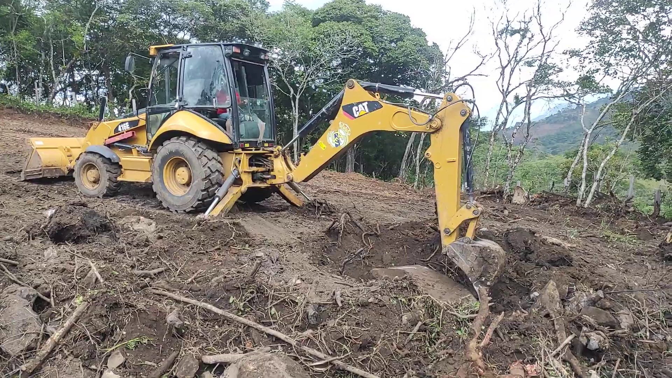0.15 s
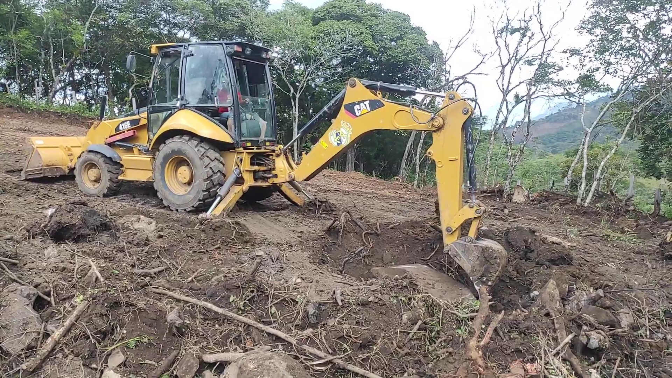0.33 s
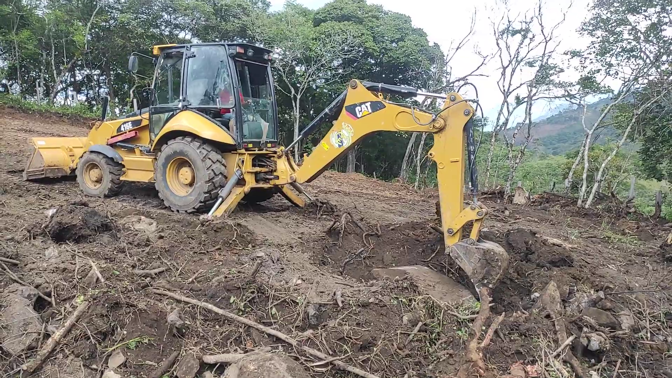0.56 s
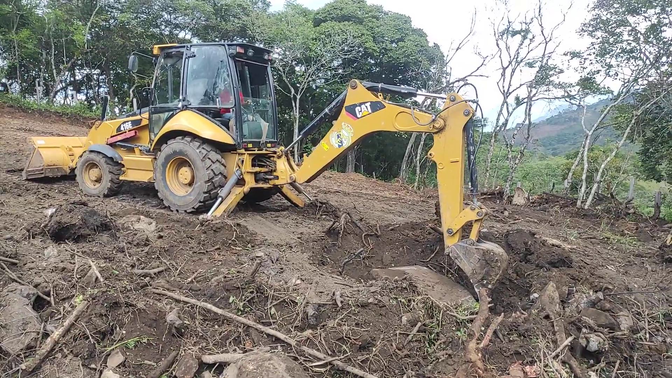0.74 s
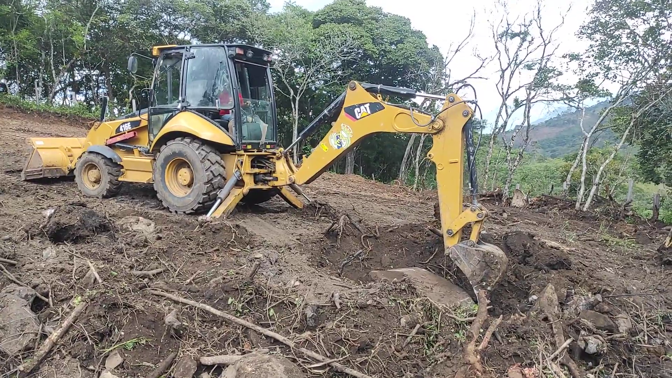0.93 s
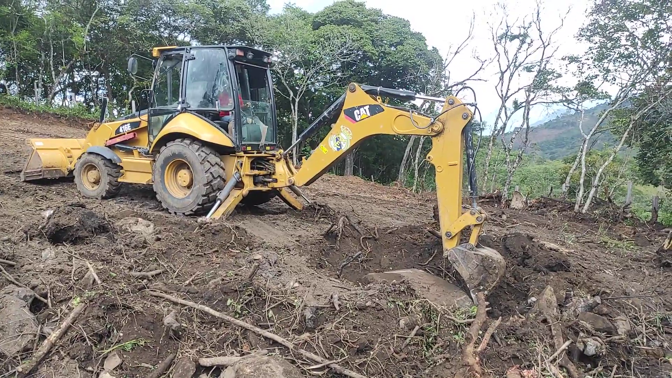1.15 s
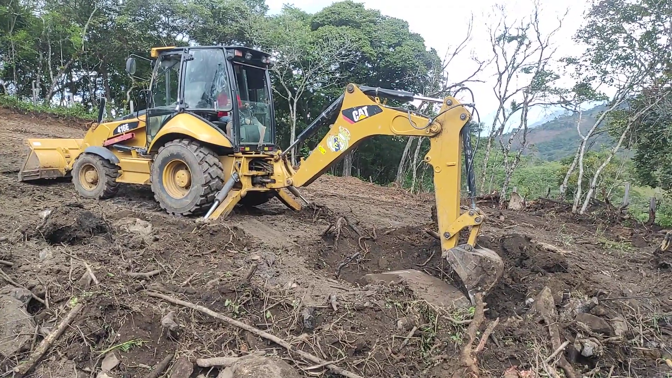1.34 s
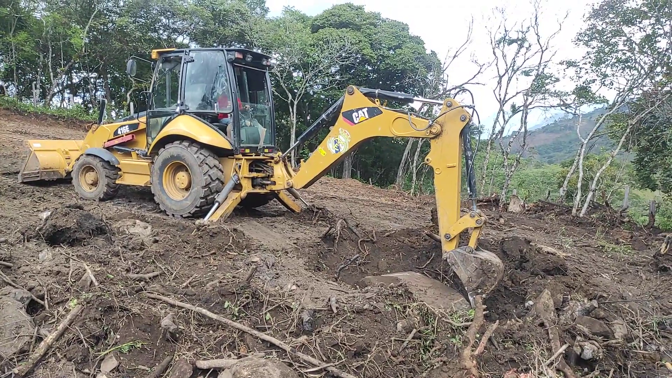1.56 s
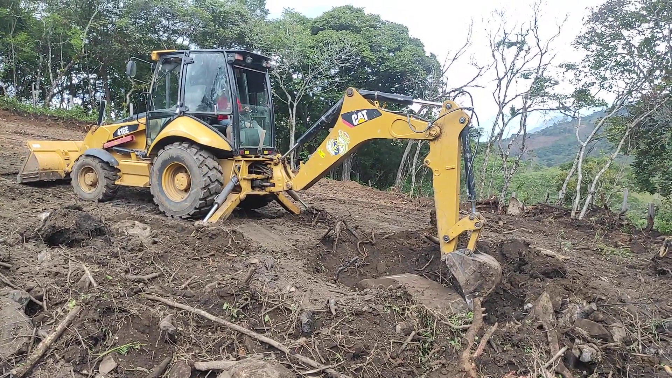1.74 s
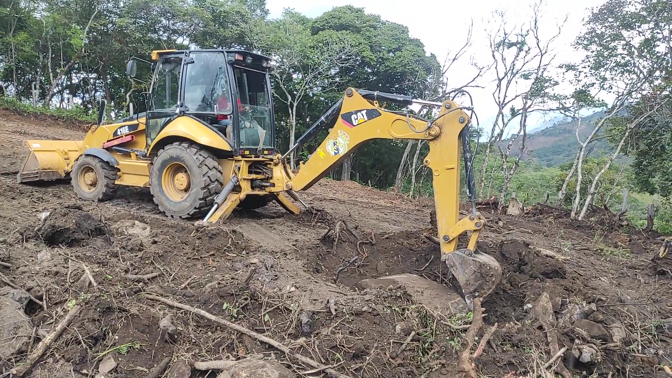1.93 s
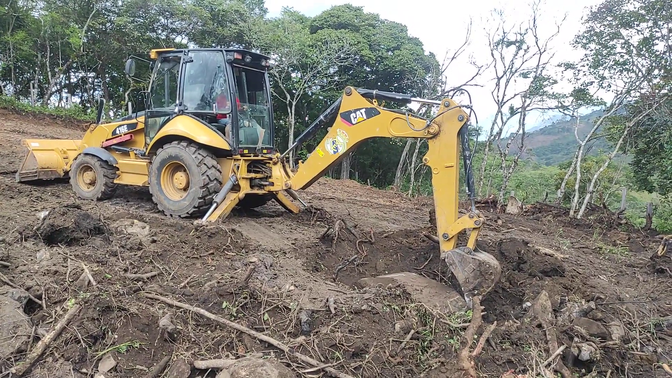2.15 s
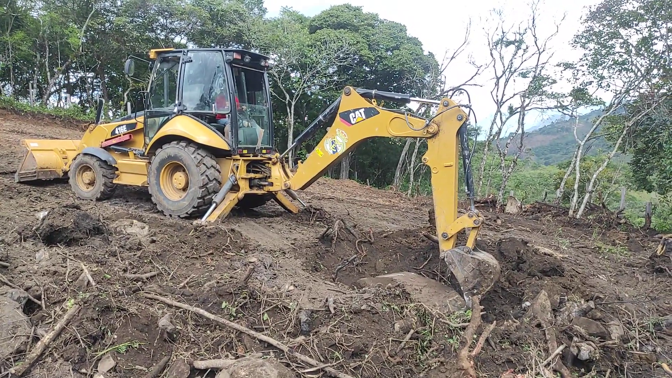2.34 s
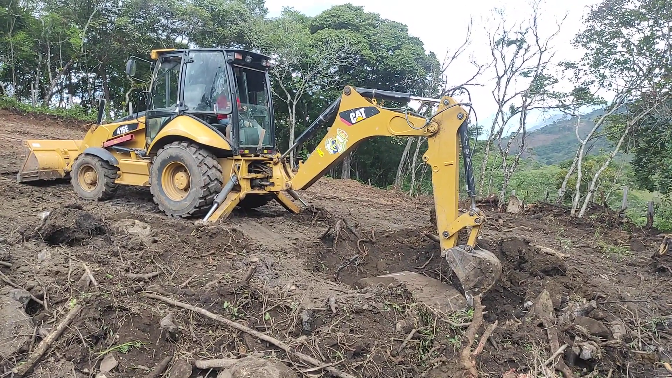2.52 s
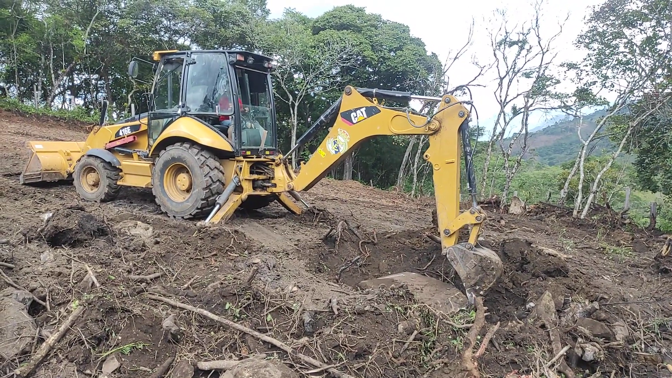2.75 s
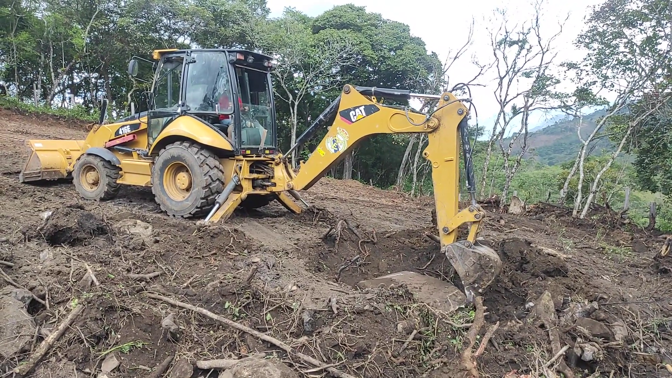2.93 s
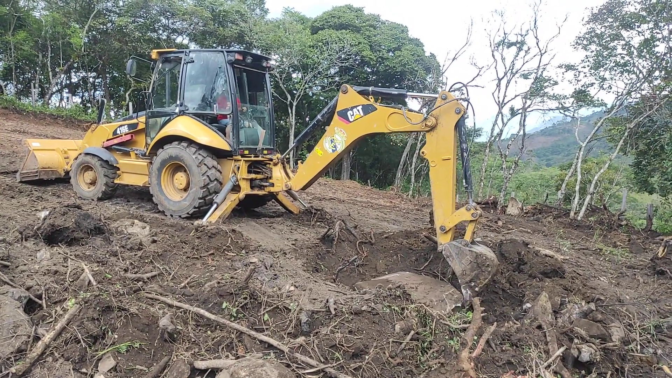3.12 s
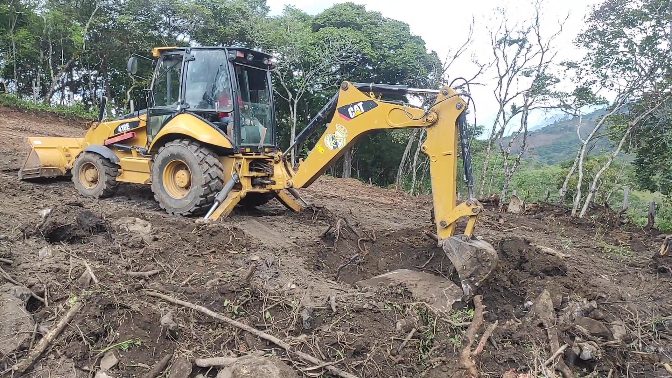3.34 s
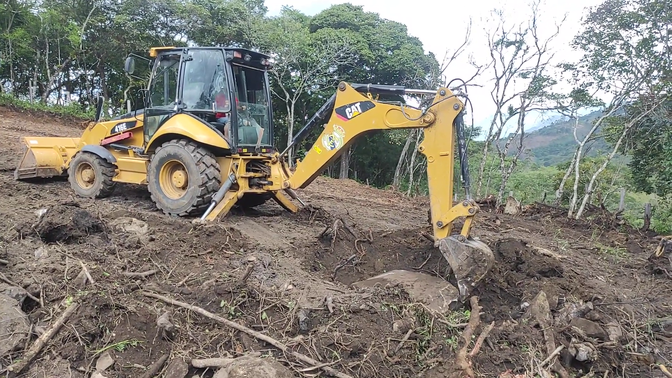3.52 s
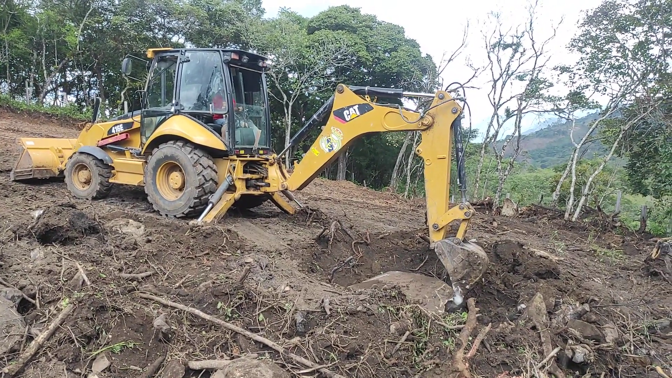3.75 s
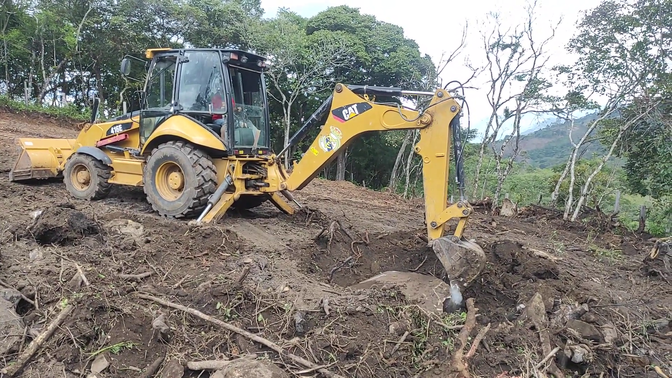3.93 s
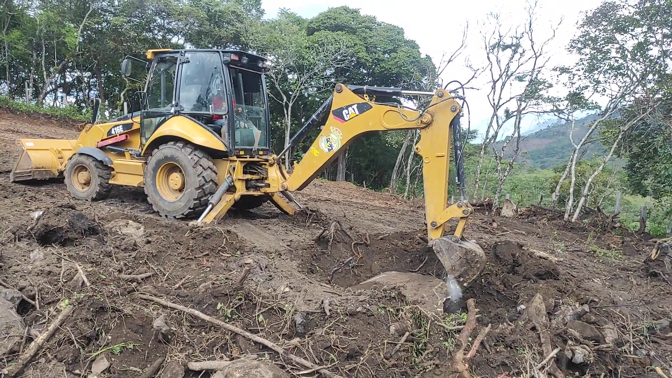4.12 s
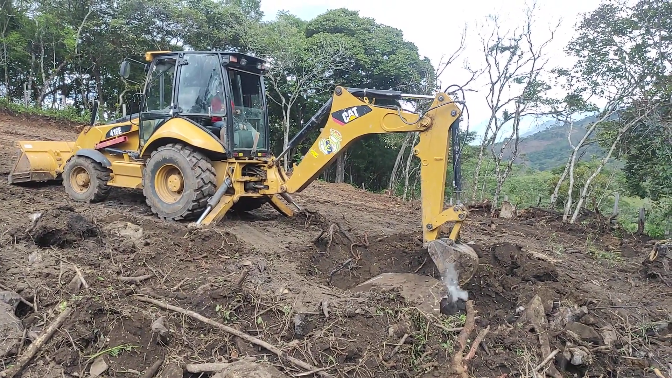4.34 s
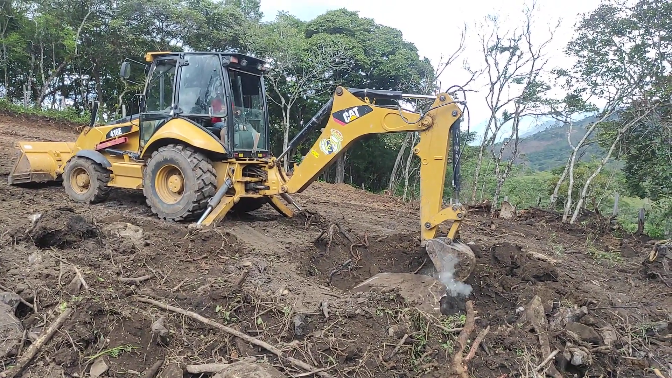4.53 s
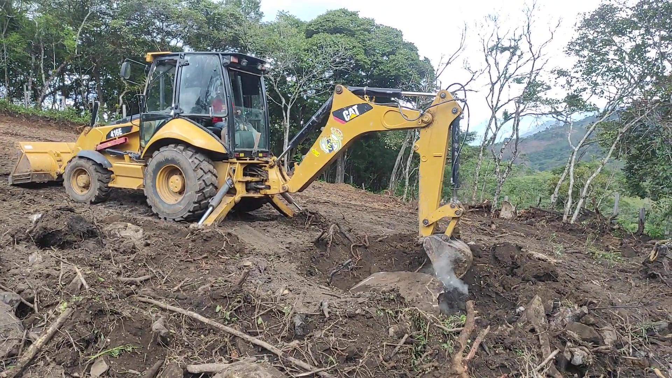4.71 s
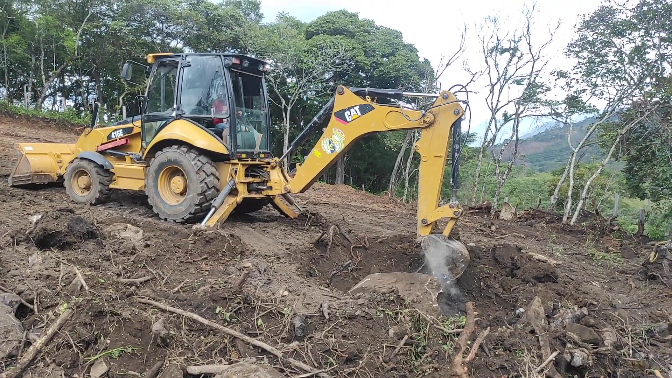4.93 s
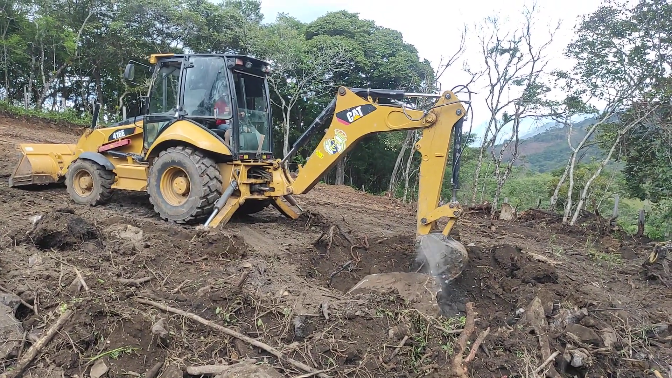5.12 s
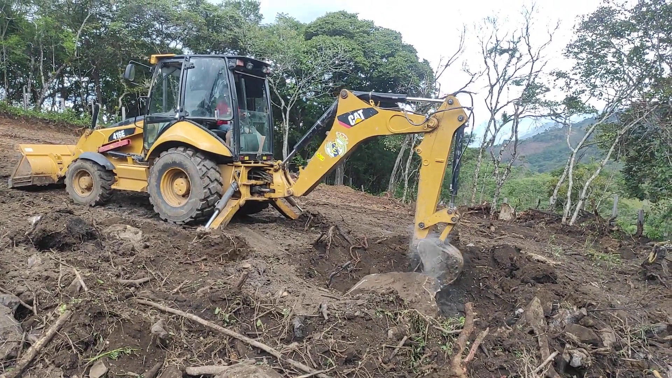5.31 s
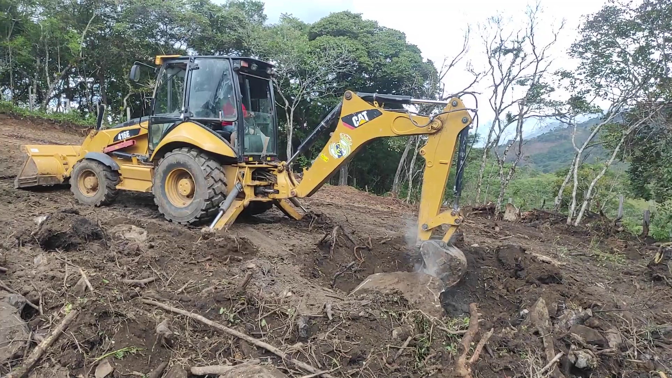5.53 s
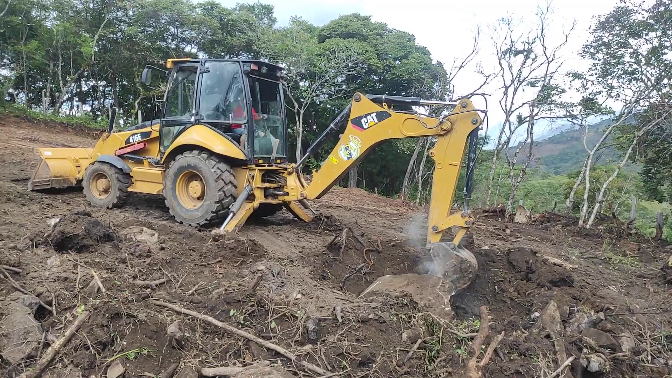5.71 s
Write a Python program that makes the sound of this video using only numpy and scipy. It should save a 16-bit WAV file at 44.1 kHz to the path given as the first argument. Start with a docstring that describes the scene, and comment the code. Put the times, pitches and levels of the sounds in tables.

```python
"""A four-cylinder diesel digger idles fast on an open field, off to one side: tones over a throbbing roar.
Its hydraulic pump whines under load, as steady multiples of the engine speed with changing levels.
A small stone cracks early; from about 1 s the bucket teeth catch on buried rock and slip in jerks.
Noise and clicks ring the steel, stone cracks and grit sprays; after a lull, heavy bouts start at 3.5 and 5.1 s.
Throughout, two small microphones add a bright peak and a mild gain control."""
import sys
import numpy as np
from scipy import signal
from scipy.fft import rfft, irfft, next_fast_len
from scipy.io import wavfile
from scipy.ndimage import uniform_filter1d

SR = 44100
rng = np.random.default_rng(int(sys.argv[2]) if len(sys.argv) > 2 else 0)


def output_pcm(signal):
    """Save a mono or channel-first signal as 16-bit PCM at the path in sys.argv[1].

    Samples are clipped to [-1, 1] before scaling.
    """
    pcm = np.clip(np.atleast_2d(signal).T, -1, 1) * 32767
    wavfile.write(sys.argv[1], SR, np.round(pcm).astype(np.int16))


N = 258867
SIZE = next_fast_len(N + SR // 2)   # room for filter tails
HZ = np.arange(SIZE // 2 + 1) * SR / SIZE


def from_db(db):
    """Turn decibels into gain."""
    return 10 ** (np.asarray(db) / 20)


def in_time(rows):
    """Read each column of a table over time at every sample."""
    s, *columns = np.transpose(rows)
    return [np.interp(np.arange(N) / SR, s, column) for column in columns]


def at_hz(points):
    """Read a table over frequency at every bin, on a log frequency scale."""
    hz, values = np.transpose(points)
    return np.interp(np.log(HZ + 1), np.log(hz), values)


def causal(points):
    """Make a filter with the given dB shape that never sounds early; unit noise keeps unit power."""
    cepstrum = irfft(np.log(from_db(at_hz(points))), SIZE)
    # folding the second half onto the first gives minimum phase
    cepstrum[1:SIZE // 2] *= 2
    cepstrum[SIZE // 2:] = 0
    response = np.exp(rfft(cepstrum))
    return response / np.sqrt(np.mean(np.abs(response) ** 2))


def drift(rate_hz):
    """Wander slowly at random with spread 1: noise smoothed twice above the given rate."""
    step = 40   # samples between points
    r = np.exp(-2 * np.pi * rate_hz * step / SR)
    white = rng.standard_normal(N // step + 2002)
    slow = signal.lfilter([1], [1, -2 * r, r * r], white)[2000:]
    return np.interp(np.arange(N) / step, np.arange(len(slow)), slow / slow.std())


def ears(shared, own, like, lead):
    """Give spectra at both microphones: the right hears part of the shared sound, shifted, and part its own."""
    alike = np.clip(at_hz(like), 0, 1)
    shift = np.exp(-1j * np.interp(HZ, *np.transpose(lead)))
    right = alike * shift * rfft(shared[1], SIZE) + np.sqrt(1 - alike ** 2) * rfft(own, SIZE)
    return np.array([rfft(shared[0], SIZE), right])


def grains(per_s, spread_db):
    """Scatter two unrelated trains of uneven random clicks, rms 1."""
    sizes = from_db(spread_db * np.minimum(rng.exponential(1, (2, N)), 4))
    sizes = sizes * rng.choice([-1, 1], (2, N))
    clicks = sizes * (rng.random((2, N)) < per_s / SR)
    return clicks / clicks.std()


def patchy(noise, patchy_db, rate_hz):
    """Let each third of an octave swell and fade alone, as different stones and plates take the rubbing."""
    edges = np.geomspace(350, 17000, 18)
    out = 0
    for pair in zip(edges, edges[1:]):
        band = signal.butter(1, pair, "band", fs=SR, output="sos")
        out = out + signal.sosfilt(band, noise) * from_db(patchy_db * drift(rate_hz))
    return out / out.std()


def bursts(times, peaks_db, t60s):
    """Draw an envelope: each event jumps up and dies away by 60 dB in its t60."""
    out = np.zeros(N)
    for s, peak_db, t60 in zip(times, peaks_db, t60s):
        i = round(s * SR)
        t = np.arange(min(int(t60 * SR), N - i)) / SR
        out[i:i + len(t)] += from_db(peak_db - 60 * t / t60)
    return out


def ring(force, hz, t60):
    """Ring one mode like a struck bar: a unit click starts a dying sine of height 1."""
    r, w = from_db(-60 / (t60 * SR)), 2 * np.pi * hz / SR
    return signal.lfilter([0, np.sin(w)], [1, -2 * r * np.cos(w), r * r], force + 1e-18)


# steady tones of exhaust, gears and fan: multiple of the cycle rate, level/dB
STEADY_TONES = [(3, -52), (12, -47.5), (15, -47), (54, -53.5), (68, -59)]
# the pump straining: t/s, tone level/dB, octave level/dB, fifth multiple level/dB
PUMP_STRAIN = [(0, -61, -47.5, -43), (.25, -60.5, -53.5, -45), (.4, -72, -62, -48.5), (1.9, -65, -70, -45),
               (2.5, -40, -71, -49.5), (3.1, -32.5, -55, -50), (3.4, -45.5, -61, -47.5),
               (4.0, -41, -56, -49.5), (4.45, -44, -50, -45), (4.6, -43.5, -51, -40), (4.85, -48, -56, -41),
               (5.05, -39.5, -50, -43.5), (5.2, -47, -60, -46), (5.87, -47, -57, -42)]
IDLE_PER_S = 14.0   # engine cycles per s
FIRING_DB, LUG_DB_PER_CYCLE = -36, 8   # the firing tone swells as speed sags below idle
SECOND_DB = -18.5   # octave of the firing tone against it


def engine_tones(speed, cycle):
    """Turning parts and pump hum at exact multiples of the engine cycle, each wavering a little in level."""
    pump_db, octave_db, overtone_db = in_time(PUMP_STRAIN)
    firing_db = FIRING_DB + LUG_DB_PER_CYCLE * np.maximum(IDLE_PER_S - speed, 0)
    gear_db = np.maximum(overtone_db - 3.0, -51)   # a gear whine swells when the pump strains
    rows = list(STEADY_TONES) + [(8, firing_db + SECOND_DB), (60, gear_db)]
    rows += [(18, pump_db), (36, octave_db), (90, overtone_db)]
    # four firings a cycle, very even
    out = np.sqrt(2) * from_db(firing_db + 0.71 * drift(4.8)) * np.sin(8 * np.pi * cycle)
    for multiple, db in rows:
        wave = np.sin(2 * np.pi * (multiple * cycle + rng.random()))
        out = out + np.sqrt(2) * from_db(db + 0.98 * drift(7.9)) * wave
    return out


# the loose sheet's hum: t/s, level/dB
PANEL_LEVEL = [(0, -29.5), (.4, -49), (3.4, -52), (4.1, -40.5), (4.45, -33.5), (4.9, -42.5), (5.2, -35.5),
               (5.55, -37.5), (5.87, -38.5)]


def panel_hum():
    """A loose sheet hums at its own pitch: noise shakes one mode."""
    (level_db,) = in_time(PANEL_LEVEL)
    panel = ring(rng.standard_normal(N), hz=309.4, t60=0.74)
    return from_db(level_db) * panel / panel.std()


# knocks of firing, valves and injectors: share of the cycle, level/dB against the others
KNOCKS_IN_CYCLE = [(0.019, 0), (0.113, 0), (0.27, 2), (0.521, 0), (0.765, -6.5), (0.882, -14)]


def engine_noise(cycle, repeat_db, knock_ms, hum_db):
    """Two channels of noise that throb with the knocks below about 3 kHz; fan and turbo hiss above is smooth."""
    clicks = np.zeros(N)
    for share, db in KNOCKS_IN_CYCLE:
        at = np.flatnonzero(np.diff(np.floor(cycle - share)))
        clicks[at] += from_db(db + rng.normal(0, 0.23, len(at)))   # no two blows alike
    throb = signal.lfilter([1], [1, -np.exp(-1000 / (knock_ms * SR))], clicks)
    white = rng.standard_normal((4, N))
    rough = (from_db(hum_db) + throb) * white[:2] + from_db(repeat_db) * clicks
    hiss = white[2:] * from_db(1.26 * drift(17))
    low = signal.butter(2, 2600, fs=SR, output="sos")
    high = signal.butter(2, 2600, "high", fs=SR, output="sos")
    return signal.sosfilt(low, rough / rough.std()) + signal.sosfilt(high, hiss)


# engine speed, sagging under load: t/s, four-stroke cycles per s
ENGINE_SPEED = [(0, 14.05), (.3, 14.22), (.75, 14.27), (.9, 14.09), (1.2, 14.28), (1.5, 14.13),
                (2.1, 14.28), (2.55, 14.08), (3.15, 14.06), (3.45, 14.2), (3.9, 14.1), (4.1, 14.24),
                (4.55, 13.65), (4.8, 13.96), (5.12, 13.6), (5.3, 14.7), (5.55, 14.58), (5.87, 13.8)]
# roar of block, bonnet and fan: f/Hz, level per Hz/dB (shape only)
ROAR_COLOUR = [(30, -37), (70, -4.5), (140, -11), (210, 0), (400, -2.5), (550, -17), (700, -7), (850, -3),
               (1000, -8), (1400, -11), (2000, -11.5), (2350, -14), (2750, -14.5), (3300, -23)]
# how far the left microphone leads: f/Hz, lead/rad
ENGINE_LEAD = [(0, -0.15), (300, -0.3), (900, -1.0), (1200, -2.5), (1700, -2.5), (2350, -9.5),
               (3100, -15.5), (4500, -28), (6800, -37.5), (8400, -50), (16000, -69)]
# how alike left and right are: f/Hz, likeness (0 to 1)
ROAR_LIKENESS = [(100, 1), (900, 0.78), (1700, 0.55), (2500, 0.61), (5000, 0.38), (9000, 0.028)]
# engine off to one side: f/Hz, left minus right/dB
ENGINE_PAN = [(60, 3.8), (380, 4.5), (1300, 2.5), (4400, -1), (9000, 0.5)]
ROAR_DB = -34


def engine(repeat_db, knock_ms, hum_db):
    """Clean tones tied to the cycle rate, over a roar that throbs with the knocks of each cycle."""
    (speed,) = in_time(ENGINE_SPEED)
    cycle = np.cumsum(speed) / SR   # cycles turned so far
    tones = engine_tones(speed, cycle) + panel_hum()
    shared, own = from_db(ROAR_DB) * engine_noise(cycle, repeat_db, knock_ms, hum_db)
    roar = causal(ROAR_COLOUR) * ears([shared, shared], own, ROAR_LIKENESS, ENGINE_LEAD)
    pure = ears([tones, tones], tones, [(1, 1), (2, 1)], ENGINE_LEAD)   # fully alike
    return (roar + pure) * from_db(at_hz(ENGINE_PAN) * [[.5], [-.5]])


# how alike left and right are: f/Hz, likeness (0 to 1)
BUCKET_LIKENESS = [(100, .99), (700, .95), (1400, 0.8), (3000, 0.3), (9000, 0.3)]
# how far the left microphone leads: f/Hz, lead/rad
BUCKET_LEAD = [(0, -0.35), (600, 0.44), (2000, 1.77), (16000, -12.5)]


def from_bucket(shared, own):
    """Carry a sound from the bucket to both microphones, partly alike and shifted in phase."""
    return ears(shared, own, BUCKET_LIKENESS, BUCKET_LEAD)


# stone cracks, levels within the layer: t/s, peak level/dB, dull part level/dB, t60/s, left minus right/dB
STONE_CRACKS = [(0.1066, -34, -33.5, 0.053, 4), (0.851, -35, -33, 0.07, 10), (.9153, -37, -44, 0.095, 11),
                (1.0072, -19.5, -22, 0.0055, 9), (1.5564, -25, -36, 0.033, 6), (1.591, -26.5, -38, 0.13, 8),
                (1.651, -18, -20.5, 0.053, 9), (3.403, -31, -48, 0.091, 9), (3.5321, -27, -28, 0.05, 7),
                (3.569, -17.5, -30, 0.088, 5), (3.575, -14, -17.5, 0.066, -2), (3.5965, -14, -19, 0.16, -7),
                (3.622, -12.5, -22, 0.051, -3), (3.765, -24, -31.5, 0.11, -6), (4.1363, -21, -28, 0.05, 2),
                (4.158, -25, -31, 0.42, 8), (4.1882, -10, -27, 0.11, -1), (4.205, -14, -18, 0.045, 2),
                (4.225, -27, -20, 0.16, -13), (4.2504, -12.5, -20, 0.051, -3), (4.305, -22, -34, 0.068, -8),
                (4.461, -32, -28, 0.056, 17), (4.523, -30, -30, 0.092, -1), (5.131, -18.5, -23, 0.23, 3),
                (5.1566, -21, -24, 0.069, -12), (5.159, -11.5, -24, 0.089, -11), (5.231, -41, -26, 0.12, 4),
                (5.294, -27, -33, 0.12, 9), (5.4086, -24, -33, 0.046, 4), (5.684, -35, -39, 0.31, 11),
                (5.72, -24, -42, 0.067, 13)]
# dull part of a crack: f/Hz, level per Hz/dB (shape only)
DULL_COLOUR = [(900, -3), (1800, 1), (2700, -3), (3400, -11), (4500, -12), (7000, -18)]
# bright part of cracks, and grit: f/Hz, level per Hz/dB (shape only)
GRIT_COLOUR = [(2000, -10.5), (4500, -2), (8000, 3), (11000, 5), (16000, -13)]
CRUNCH_DB = -6   # small stones crushed by the grinding teeth
SNAP_DB = 4.5   # the first snap against the peak


def stone(grind, grit):
    """Cracks and spraying grit are many tiny clicks: a dull crunch, a bright spray and a sharp first snap."""
    s, peak_db, dull_db, t60s, pan_db = np.transpose(STONE_CRACKS)
    sides_db = [peak_db + pan_db / 2, peak_db - pan_db / 2]
    chips = patchy(grains(7000, spread_db=4.5), patchy_db=3.5, rate_hz=18)
    crumbs = patchy(grains(4000, spread_db=4.0), patchy_db=3.5, rate_hz=30)   # coarser than the grit
    dull_level = bursts(s, dull_db, t60s) + from_db(CRUNCH_DB) * grind
    shared, own = dull_level * crumbs
    dull = causal(DULL_COLOUR) * from_bucket([shared, shared], own)
    crack = np.array([bursts(s, db, t60s) for db in sides_db])
    spray = crack + grit * from_db([[1.5], [-1.5]])
    # the first snap is one click that rings the chip for a few ms
    clicks = [bursts(s, db + SNAP_DB, np.full_like(s, 0.0001)) for db in sides_db]
    snap = np.array([ring(click, hz=7700, t60=0.0041) for click in clicks])
    bright = from_bucket(spray * chips[0] + snap, spray[1] * chips[1] + snap[1])
    return dull + causal(GRIT_COLOUR) * from_db(-8.5) * bright


# teeth dragging over rock, one row a stroke, levels within each layer:
# start t/s, rise t/s, fall t/s, boom level/dB, grind level/dB, grit level/dB
DRAG_STROKES = [(.93, 0.055, 0.13, -39, -39, -34.5), (1.641, 0.0062, 0.1, -23, -30, -26),
                (3.532, 0.014, 0.093, -30.5, -35, -28), (3.569, 0.0059, 0.12, -21.5, -18, -21.5),
                (3.661, 0.053, 0.12, -39, -33.5, -44), (3.763, 0.07, 0.14, -29, -36, -63),
                (4.137, 0.1, 0.064, -18.5, -20, -18), (4.304, 0.014, 0.29, -29.5, -29, -33),
                (5.117, 0.018, 0.031, -16, -20, -26), (5.17, 0.049, 0.078, -28.5, -21.5, -19),
                (5.29, 0.03, 0.14, -27.5, -35.5, -32.5), (5.374, 0.046, 0.13, -42, -32.5, -28.5),
                (5.674, 0.051, 0.048, -28, -24.5, -24.5), (5.745, 0.062, 0.074, -27, -26, -36)]
BITE_DB, LET_GO_DB, DIE_S = -13.5, -19, 0.034   # a stroke starts and ends this far under its top, then dies
SWELL_DB = -6.5   # halfway up and a third of the way down


def drag():
    """Levels of boom, grind and grit: each stroke bites, swells to its top, falls and lets go."""
    t, out = np.arange(N) / SR, 0
    points_db = [-70, BITE_DB, SWELL_DB, 0, SWELL_DB, LET_GO_DB, -70]
    for start, rise, fall, *tops_db in DRAG_STROKES:
        steps = [-.003, .003, rise / 2, rise / 2, fall / 3, fall * 2 / 3, DIE_S]
        times = start + np.cumsum(steps)
        shape_db = np.interp(t, times, points_db, left=-200, right=-200)
        out = out + from_db(shape_db) * from_db(tops_db)[:, None]
    return out


# jolts of the bucket, levels against each other:
# t/s, low peak level/dB, centre of the low modes f/Hz, upper clang peak level/dB, its centre f/Hz
BUCKET_JOLTS = [(.96, -19, 231, -14, 1480), (1.651, -22, 360, -16, 1500), (1.655, -14.5, 186, -14.5, 860),
                (1.667, -14, 293, -16, 760), (1.694, -26, 190, -37, 1400), (3.533, -21, 332, -13.5, 810),
                (3.575, -3, 199, -2, 785), (3.583, -4, 107, -11, 940), (3.598, -11, 194, -8, 950),
                (3.640, -8, 162, -10, 960), (3.765, -12, 160, -21, 970), (3.845, -19, 330, -14.5, 690),
                (4.166, -20, 262, -24, 800), (4.176, -4, 263, -12, 760), (4.204, -12, 283, -1.5, 930),
                (4.213, 5, 108, -27, 950), (4.218, 2, 262, -10, 800), (4.238, 2, 391, -11, 780),
                (4.255, 0, 148, -6, 970), (4.271, -10, 234, -16, 950), (4.38, -16, 246, -34, 780),
                (5.124, -24, 335, -28, 950), (5.142, -10.5, 390, -8, 704), (5.159, -8.5, 335, -18, 950),
                (5.165, -6, 84.5, -26, 800), (5.174, -15, 265, -32, 800), (5.214, -32, 330, -23, 1400),
                (5.231, -15, 400, -18, 800), (5.265, -10, 416, -8.5, 770), (5.294, -11, 390, -9, 990),
                (5.304, -11.5, 340, -19, 810), (5.389, -13, 370, -30, 800), (5.41, -26, 200, -12, 845),
                (5.428, -15, 308, -18, 800), (5.679, -20, 352, -8.5, 900), (5.700, -9, 395, -13, 860),
                (5.716, -24, 390, -18, 1500), (5.729, -13, 395, -7.5, 960), (5.765, -7, 333, -17, 1000),
                (5.773, -20, 249, -18, 900), (5.787, -10, 400, -16, 960), (5.806, -3.5, 370, -3, 1030)]
RATTLE_T60_S, RATTLE_HZ, RATTLE_LAW = 0.074, 250, 0.14   # t60 at this centre; low jolts rattle longer
CLANG_LAG_S = 0.001987


def jolts():
    """Each jolt shakes the low modes, then the upper ones: times, peaks, t60s, centres."""
    s, low_db, low_hz, clang_db, clang_hz = np.transpose(BUCKET_JOLTS)
    times = np.append(s, s + CLANG_LAG_S)
    peaks_db = np.append(low_db, clang_db)
    centre = np.append(low_hz, clang_hz)
    t60s = RATTLE_T60_S * (RATTLE_HZ / centre) ** RATTLE_LAW
    return times, peaks_db, t60s, centre


# bucket and arm ringing: f/Hz, level/dB against each other, t60/s before the soil's limit
BUCKET_MODES = [(80.6, -12, 0.2), (103.7, -6, 0.079), (163, -5, 0.25), (199, -1.5, 0.23),
                (251.1, 0.5, 0.23), (305.4, -7, 0.16), (342, -2.5, 0.15), (391.7, 0.5, 0.074),
                (457, -18.5, 0.6), (692, -5.5, 0.43), (763, 2.5, 0.062), (844, -4.5, 0.17),
                (955, 4.5, 0.085), (1030, -23, 0.11), (1233, -18, 0.11), (1436, -14, 0.05), (1560, 0, 0.08),
                (1965, -5, 0.18)]
BURIED_T60_S, UNEVEN_DB = .24, 2   # soil damps every ring to this at most; no two blows strike the modes alike


def steel(levels, slips, drag_db, jolt_db, blow_db, reach_db):
    """Drag shakes every mode; a jolt's blow and rattle favour those near its centre, less by reach_db an octave."""
    s, peak_db, t60s, centre = jolts()
    boom, grind = levels
    uneven_db = UNEVEN_DB * rng.standard_normal((len(s), len(BUCKET_MODES)))
    out = 0
    for k, (hz, db, t60) in enumerate(BUCKET_MODES):
        far_db = reach_db * np.abs(np.log2(hz / centre))
        near_db = peak_db + jolt_db - far_db + uneven_db[:, k]
        rubbing = grind if hz > 600 else boom
        rattle = bursts(s, near_db, t60s) + from_db(drag_db) * rubbing
        blow = bursts(s, near_db + blow_db, np.full_like(s, 0.0025))
        blow = np.diff(blow, prepend=0) * SR / (2 * np.pi * hz)   # a push with no lasting thrust
        force = (-1) ** k * rattle * slips + blow   # the rattle's sign alternates from mode to mode
        out = out + from_db(db) * ring(force, hz, min(t60, BURIED_T60_S))
    return out


# a tooth tip pings on stone: t/s, peak level/dB, f/Hz
TOOTH_PINGS = [(1.649, -23.5, 2410), (3.572, -11.5, 2000), (3.625, -21, 2750), (4.171, -15.5, 2140),
               (4.189, -21, 3100), (5.138, -21, 2300), (5.157, -12.5, 2910), (5.234, -29, 2700),
               (5.407, -25, 1760), (5.698, -32, 2580), (5.722, -18.5, 1510), (5.802, -30, 2000)]
PING_T60_S, SKID_T60_S = 0.03, 0.025   # ring of the tip, and the skid that excites it


def teeth():
    """Each ping is a brief skid of noise through the tip's short resonance."""
    out, length = np.zeros(N), SR // 20
    fade = from_db(-60 * np.arange(length) / SR / SKID_T60_S)
    for s, peak_db, hz in TOOTH_PINGS:
        skid = fade * rng.standard_normal(length)
        ping = ring(skid, hz, PING_T60_S)
        i = round(s * SR)
        out[i:i + length] += from_db(peak_db) * ping / np.abs(ping).max()
    return out


# low boom of the steel: f/Hz, level per Hz/dB (shape only)
BOOM_COLOUR = [(60, -9.5), (110, 0), (250, -1), (400, 7), (550, -7.5), (700, -9), (1500, -55.5)]
# grinding of teeth on rock: f/Hz, level per Hz/dB (shape only)
GRIND_COLOUR = [(400, -49), (650, 3), (950, 7), (1200, -2), (2000, -8), (3000, -22.5), (5000, -28)]
# side the bucket is heard on: f/Hz, left minus right/dB
BUCKET_PAN = [(100, 3), (700, 2.5), (2400, -1), (5000, -1), (7000, -4.5), (8500, 8), (12000, -3)]


def bucket(jolt_db):
    """Stick-slip clicks under the drag and the jolts shake the steel; cracks and grit come from the stone."""
    boom, grind, grit = drag()
    s, peak_db, t60s, _ = jolts()
    jolt = bursts(s, peak_db, t60s) * from_db(jolt_db)
    slips = grains(900, spread_db=3.5)
    rasp = patchy(grains(1400, spread_db=1.5), patchy_db=3.5, rate_hz=18)
    rung = steel([boom, grind], slips[0], drag_db=-38.5, jolt_db=-43, blow_db=13.0, reach_db=50.0)
    rung = rung + teeth()
    out = stone(grind, grit) + from_bucket([rung, rung], rung)
    layers = [(boom + jolt, slips, BOOM_COLOUR), (grind + 0.14 * jolt, rasp, GRIND_COLOUR)]
    for level, noise, colour in layers:
        shared, own = level * noise
        out = out + causal(colour) * from_bucket([shared, shared], own)
    return out * from_db(at_hz(BUCKET_PAN) * [[.5], [-.5]])


def scene():
    """Add engine and bucket in the open, with no echoes."""
    mix = engine(repeat_db=30.5, knock_ms=4.4, hum_db=15.5) + bucket(jolt_db=-27.0)
    return irfft(mix, SIZE)[:, :N]


# microphone colour: f/Hz, level/dB (shape only)
MICROPHONE_COLOUR = [(3000, 0.5), (4600, 2), (5500, 4), (7200, 10.5), (8400, 7), (9200, -3), (9900, -20),
                     (11000, -21), (13500, -18), (15500, -18)]
CUTOFF_HZ = 16300   # the top cut is complete from here up


def record(dry):
    """Microphone colour, gain control that ducks under loud bursts, soft overload, bass and steep top cuts."""
    colour = causal(MICROPHONE_COLOUR)
    x = irfft(rfft(dry, SIZE) * colour / np.abs(colour[1]), SIZE)[:, :N]
    power = uniform_filter1d(np.mean(x ** 2, axis=0), size=882)   # 20 ms average
    level_db = 10 * np.log10(power + 1e-10)
    slope = 60.0 * np.arange(N) / SR   # the held level falls by 60 dB per s
    held_db = np.maximum.accumulate(level_db + slope) - slope
    x = x * from_db(-.25 * np.maximum(held_db + 19, 0))   # a quarter dB down per dB above -19
    x = .85 * np.tanh(x / .85)   # peaks are rounded
    bass_cut = signal.butter(2, 36, "high", fs=SR, output="sos")   # small capsules lose the deepest bass
    top_cut = signal.cheby2(12, 70, CUTOFF_HZ, fs=SR, output="sos")
    return signal.sosfilt(top_cut, signal.sosfilt(bass_cut, x))


dry = scene()
out = record(dry)
output_pcm(out)
```